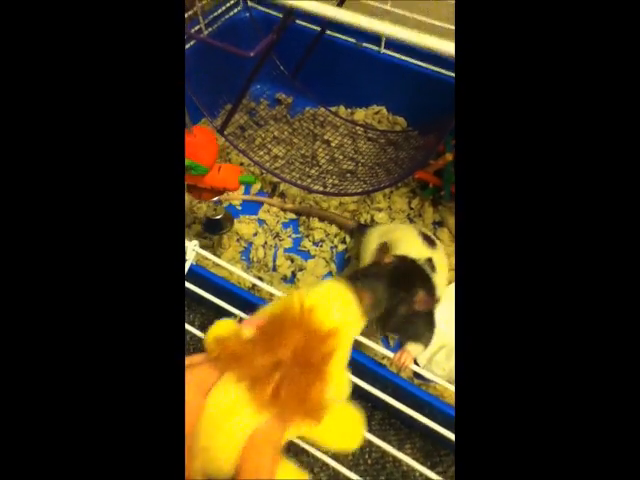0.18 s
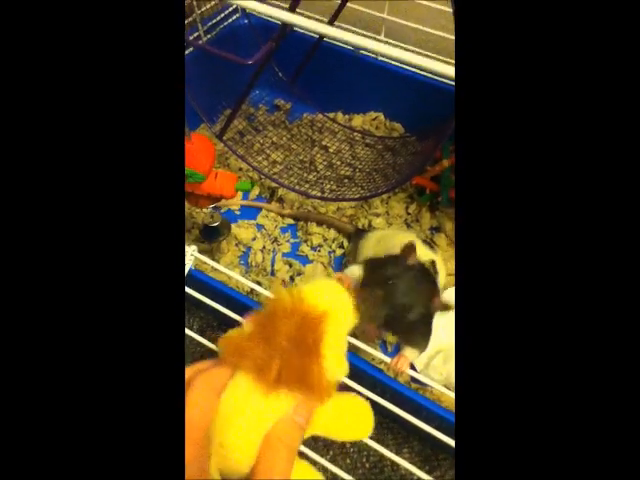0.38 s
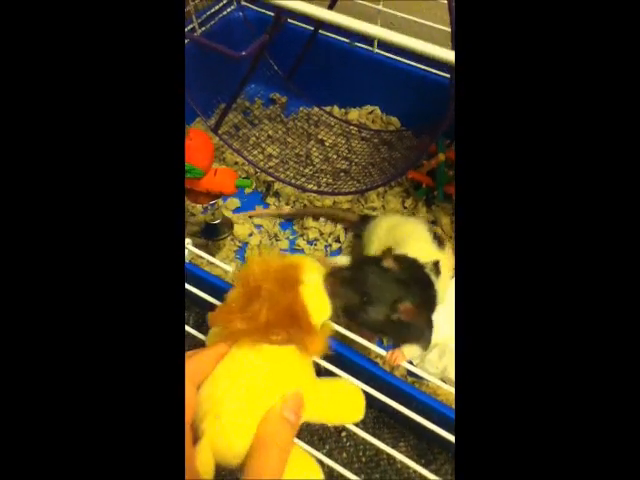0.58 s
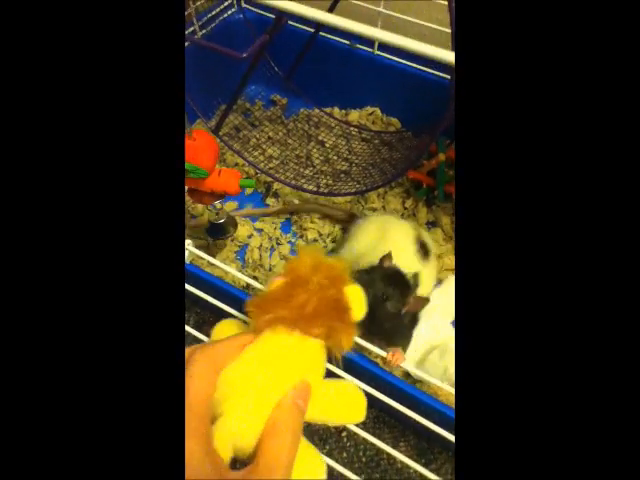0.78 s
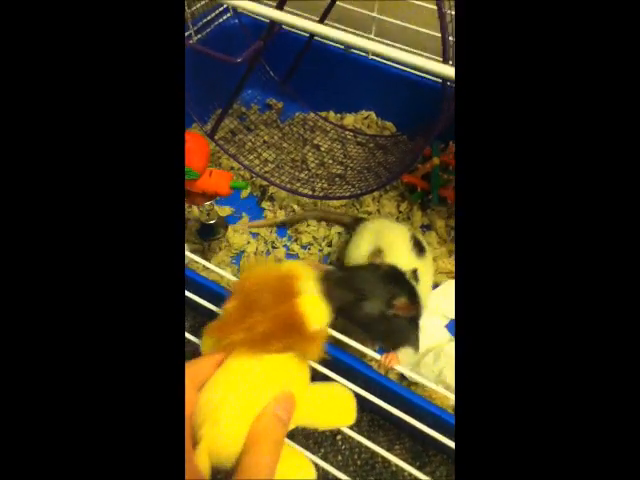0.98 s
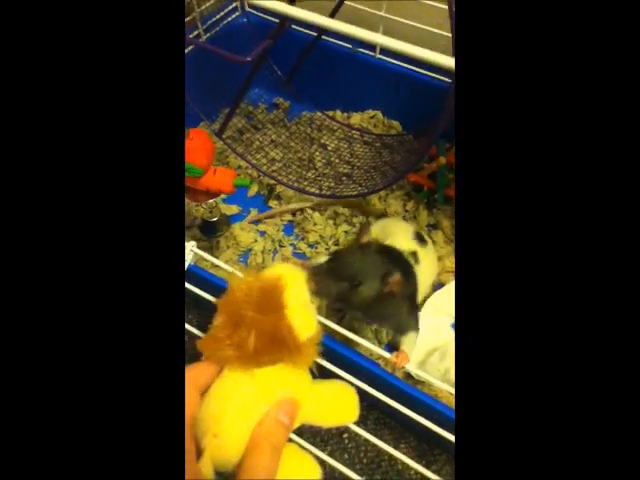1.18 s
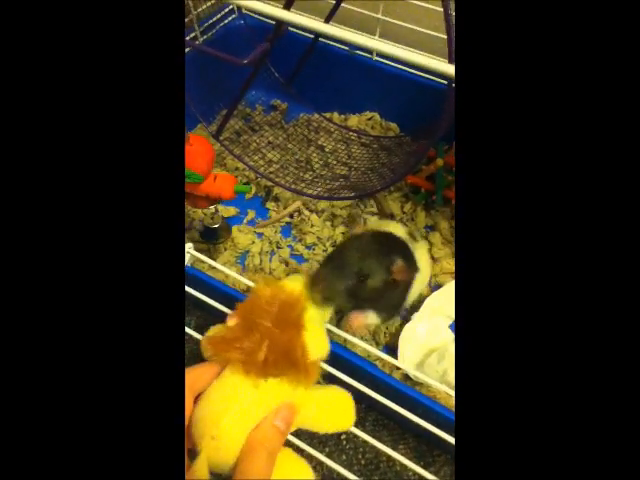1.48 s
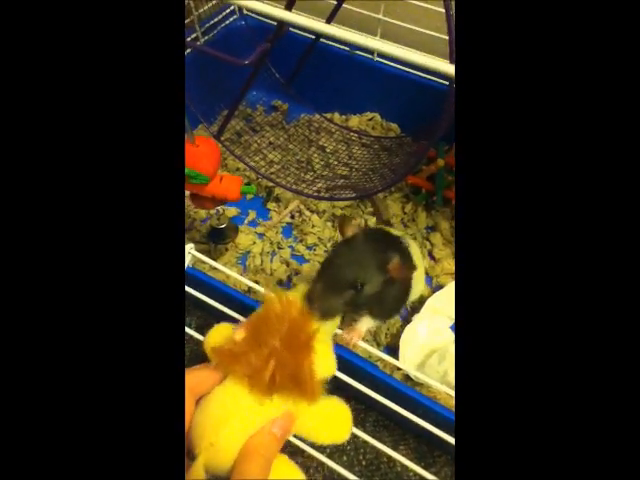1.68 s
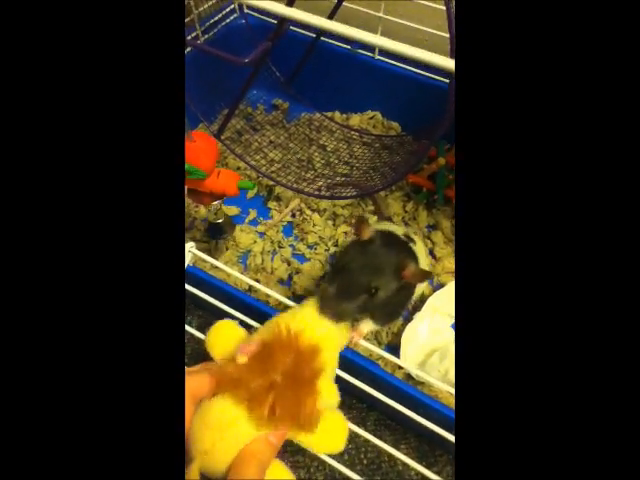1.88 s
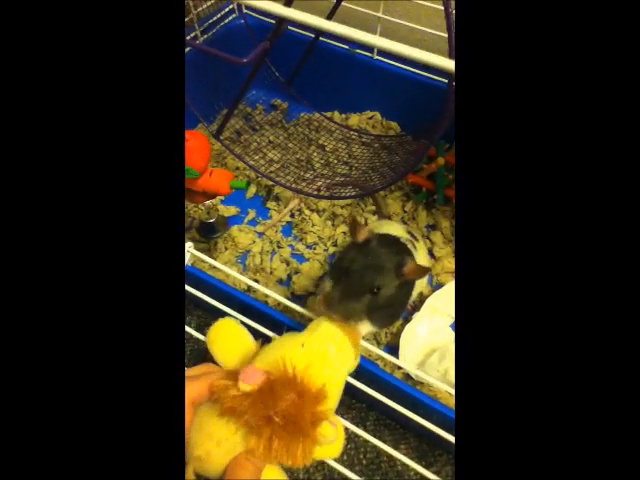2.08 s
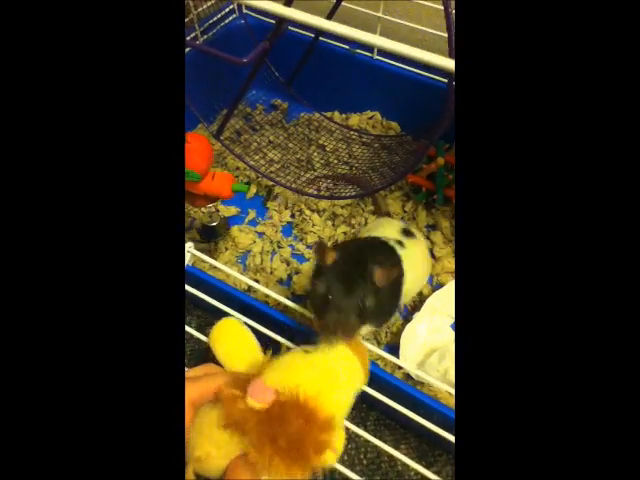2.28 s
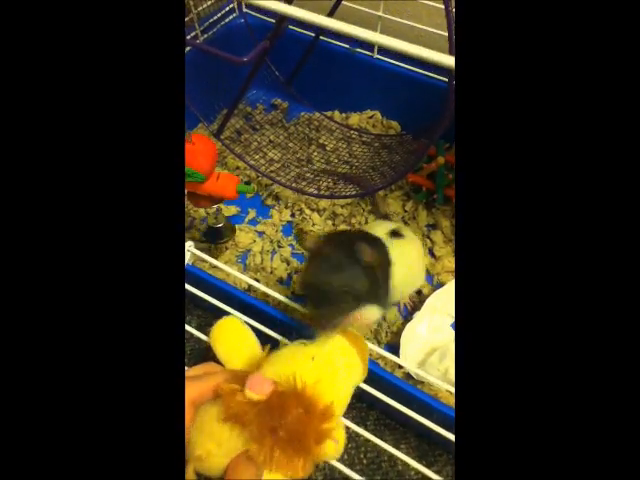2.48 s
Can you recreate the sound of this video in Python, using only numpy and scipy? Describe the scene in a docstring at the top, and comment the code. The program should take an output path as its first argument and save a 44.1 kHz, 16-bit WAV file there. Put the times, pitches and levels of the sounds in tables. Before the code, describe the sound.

Close up in a small room, a rat squeaks once, high and sharp. As it tugs a plush toy, its wire cage knocks and scrapes briefly. Two tiny peeps and light tooth or claw ticks follow over a faint fan hum.

```python
"""A pet rat tugs at a plush toy at the door of its wire cage, close by in a small room.
Pulses of air ring its throat in one sharp squeak; later it whistles two tiny falling peeps.
Its teeth or claws tick, plush and bedding rustle, and the toy bumps the plastic tray.
The tugging knocks and scrapes the wire against the tray, making them ring.
A fan-like hum runs underneath."""
import sys
import numpy as np
from scipy import signal
from scipy.fft import rfft, irfft
from scipy.io import wavfile

SR = 44100
rng = np.random.default_rng(int(sys.argv[2]) if len(sys.argv) > 2 else 0)


def to_wav(sig):
    """Store sig (one row per channel, or 1-D mono) as 16-bit WAV at the path in sys.argv[1].

    Samples outside -1..1 are clipped; the rate is SR.
    """
    pcm = np.clip(np.atleast_2d(sig), -1, 1) * 32767
    pcm = np.round(pcm).astype(np.int16)
    wavfile.write(sys.argv[1], SR, pcm.T)  # frames by channels


N = 114660
TIME = np.arange(N) / SR

# notes the plastic tray rings with: f/Hz, level/dB, time to fade by 60 dB/s
TRAY_NOTES = [(219, -13, 0.078), (379.5, 3.5, 0.083), (467, -0.5, 0.054), (716, -1, 0.17),
              (768, 6.5, 0.052), (943, -2.5, 0.039), (1196, -2, 0.025), (2040, -5, 0.036)]
# colour (how strong each frequency is) of wire grating on the tray: f/Hz, level/dB
GRIT_COLOUR = [(100, -16), (400, -3), (2000, -1.5), (2600, -5.5), (4500, -6), (8000, -13), (11000, -18),
               (15000, -55)]


def amp(db):
    """Turns decibels into a gain to multiply by."""
    return 10 ** (np.asarray(db) / 20)


def unit(x):
    """Scales a signal to an average size (rms) of 1."""
    return x / np.sqrt(np.mean(x ** 2) + 1e-20)


def read(points, hz):
    """Looks up a table between its rows, on a log-frequency axis."""
    f, value = np.transpose(points)
    return np.interp(np.log(hz + 1), np.log(f + 1), value)


def curve(points):
    """Joins (time, value) points with straight lines."""
    return np.interp(TIME, *np.transpose(points))


def level(points):
    """Gain over time from (time, dB) points, silent outside them."""
    return amp(curve(points)) * (TIME >= points[0][0]) * (TIME <= points[-1][0])


def add(mix, start, sound):
    """Mixes a sound in at a start time in seconds."""
    part = mix[max(round(start * SR), 0):][:len(sound)]
    part += sound[:len(part)]


def drift(rate_hz):
    """Smooth random wavering of rms 1."""
    keep_slow = np.exp(-(np.fft.rfftfreq(N, 1 / SR) / rate_hz) ** 2)
    return unit(irfft(rfft(rng.standard_normal(N)) * keep_slow, N))


def noise(colour):
    """Steady noise of a given colour, rms 1."""
    gain = amp(read(colour, np.fft.rfftfreq(N, 1 / SR)))
    return unit(irfft(rfft(rng.standard_normal(N)) * gain, N))


def impulse(colour, size=2048):
    """A click of a given colour, energy 1; it also serves as a filter."""
    log_gain = np.log(amp(read(colour, abs(np.fft.fftfreq(size, 1 / SR)))))
    spectrum = np.exp(np.conj(signal.hilbert(log_gain)))  # packs the energy at the start
    click = np.fft.ifft(spectrum).real[:size // 2]
    return click / np.linalg.norm(click)


def ring(notes, size=6000):
    """The fading notes of a struck object, peak 1."""
    t = TIME[:size]
    sound = sum(amp(db - 60 * t / fade_s) * np.sin(2 * np.pi * hz * t) for hz, db, fade_s in notes)
    return sound / abs(sound).max()


def through(x, response):
    """Filters a sound: every sample sets off a copy of the response."""
    return signal.oaconvolve(x, response)[:N]


def low_cut(x, hz):
    """Gently removes the bass below a frequency."""
    return signal.sosfilt(signal.butter(2, hz, "high", fs=SR, output="sos"), x)


def swells(rows):
    """A gain that rises and falls in a bell shape for each soft touch."""
    return sum(amp(db) * np.exp(-.5 * ((TIME - middle) / width) ** 2) for middle, width, db in rows)


def fan():
    """A fan-like low rush with a few wavering tones."""
    # tones of the hum: f/Hz, rms level/dB
    tones = [(186, -66.5), (291, -64.5), (372, -65), (909, -63.5), (4603, -79.5), (5383, -80),
             (14992, -90.5)]
    # colour of the rush: f/Hz, level/dB
    rush_colour = [(25, -4), (50, -6), (75, -8.5), (97, 1.5), (150, -1), (185, 3), (240, -1), (370, -4.5),
                   (520, -7), (700, -15.5), (900, -7), (1100, -12.5), (1400, -8.5), (1900, -18.5),
                   (2600, -16.5), (3500, -17.5), (4200, -22.5), (6500, -27), (9000, -28.5), (15500, -36)]
    # loudness of the rush: t/s, level/dB
    rush_level = [(0, -54), (.45, -52.5), (1.2, -51.5), (2.0, -52), (2.7, -51)]
    hum, waver_hz = np.zeros(N), 6
    for hz, db in tones:
        pitch = hz + waver_hz * drift(rate_hz=15)
        hum += amp(db) * np.sqrt(2) * np.sin(2 * np.pi * np.cumsum(pitch) / SR)
    return amp(curve(rush_level)) * noise(rush_colour) + hum


def rustles():
    """Plush and bedding brush together in faint swells of hiss."""
    # each rustle: middle t/s, width/s, level/dB
    touches = [(.005, 0.012, -63), (.398, .018, -60), (1.51, 0.016, -69), (1.61, .018, -61)]
    # colour of the hiss: f/Hz, level/dB
    hiss_colour = [(1000, -40), (4000, -7), (6500, -13), (8800, -2.5), (11000, -12), (15000, -20)]
    return noise(hiss_colour) * swells(touches)


def squeak():
    """Pulses and puffs of air ring the throat; as effort ends, the voice sags, dulls and roughens."""
    # pitch of the voice: t/s, f/Hz
    pitch_points = [(.2415, 1378), (.248, 1376), (.261, 1356), (.274, 1330), (.279, 1300), (.284, 1238),
                    (.289, 1150)]
    # how hard the rat pushes: t/s, level/dB (0 is full effort)
    effort_points = [(.2392, -32), (.2412, -26), (.2422, 0), (.262, -1), (.276, -1), (.283, -7),
                     (.287, -18), (.291, -42)]
    # colour given by the throat and mouth: f/Hz, level/dB
    throat_colour = [(300, -17), (1350, -16.5), (2720, -10.5), (4080, -17), (5450, -9.5), (6800, -10),
                     (8150, -2), (9100, 3.5), (9650, -7.5), (10800, -23.5), (11600, -29), (12300, -29),
                     (13200, -72)]
    # colour of the airy rasp: f/Hz, level/dB
    rasp_colour = [(300, -21), (720, -1), (1000, -4), (1900, -15), (2600, 0.5), (3500, -11), (5500, 0.5),
                   (7000, -2), (8800, 2.5), (10500, -9.5), (12500, -24.5), (13500, -51)]
    voice_db, rasp_db = -17, -39
    effort = level(effort_points)
    unsteadiness = .0022 + .011 * (1 - effort) ** 2
    pitch = curve(pitch_points) * (1 + unsteadiness * drift(rate_hz=400))
    phase = 2 * np.pi * np.cumsum(pitch) / SR
    # ten harmonics (multiples of the pitch); the higher ones fade first as effort drops
    pulses = sum(effort ** (.39 + .06 * k) * np.cos(k * phase) for k in range(1, 11)) / np.sqrt(5)
    puffs = unit((1 + np.cos(phase)) * rng.standard_normal(N)) * effort ** .6  # one each cycle
    flutter = 1 + .061 * drift(rate_hz=500)
    voice = through(pulses * flutter, impulse(throat_colour))
    rasp = through(puffs, impulse(rasp_colour))
    return amp(voice_db) * voice + amp(rasp_db) * rasp


def ticks():
    """Teeth or claws make dry, woody ticks, each with a bright snap and one close echo."""
    # each tick: t/s, level/dB, snap relative to that level/dB
    hits = [(0.3374, -21.5, -34), (1.734, -40.5, -10), (1.8326, -38, -14), (1.8359, -33.5, -1),
            (1.8407, -25, -8), (1.8435, -29, -6), (1.9327, -36, -12), (1.936, -36, -5), (1.9399, -32.5, -3)]
    # colour of the woody part: f/Hz, level/dB
    body_colour = [(100, -28), (900, -12.5), (1700, -6.5), (2300, 4), (2750, 3), (3350, 1.5), (3900, 1.5),
                   (4700, -0.5), (6500, -12.5), (10000, -24), (15000, -30)]
    # colour of the snap: f/Hz, level/dB
    snap_colour = [(500, -13), (4000, -33), (9000, 20), (12000, 10), (15000, -1)]
    echo_s, echo_db = .00092, -10
    out, body, snap = np.zeros(N), impulse(body_colour), impulse(snap_colour)
    for start, db, snap_db in hits:
        tick = body / abs(body).max() + amp(snap_db) * snap
        add(out, start, amp(db) * tick)
        add(out, start + echo_s, amp(db + echo_db) * tick)
    return out


def knocks():
    """The wire clacks and bounces once, and the tray under it thuds; soft knocks tend to be duller."""
    # each knock: t/s, clack level before dulling/dB, thud level/dB, treble cutoff f/Hz
    hits = [(0.6031, -42, -41.5, 4000), (0.8564, -17.5, -34, 10100), (0.9446, -27, -29.5, 9200),
            (1.0660, -45, -42, 4000), (1.0807, -38.5, -56, 8000), (1.1189, -30, -38.5, 2930)]
    # notes the wire rings with: f/Hz, level/dB, time to fade by 60 dB/s
    wire_notes = [(2160, -1, .017), (2500, 0.5, 0.008), (3950, -4, 0.011), (4560, 5.5, 0.0068),
                  (5000, -4, .012), (5750, -1.5, 0.009), (6200, 0, 0.0083), (8300, -24, .007)]
    crack_db, crack_s, bounce_s, bounce_db = -21, .002, .002, -4
    out, wire, tray = np.zeros(N), ring(wire_notes), ring(TRAY_NOTES)
    crack_fade = amp(crack_db) * np.exp(-TIME[:len(wire)] / crack_s)
    for start, clack_db, thud_db, cutoff_hz in hits:
        dulling = signal.butter(2, cutoff_hz, fs=SR, output="sos")
        for delay, drop_db in ((0, 0), (bounce_s, bounce_db)):
            crack = noise(GRIT_COLOUR)[:len(wire)] * crack_fade
            clack = signal.sosfilt(dulling, wire + crack)
            add(out, start + delay, amp(clack_db + drop_db) * clack)
        add(out, start, amp(thud_db) * tray)
    return out


def bumps():
    """The soft toy bumps the tray, making dull swells of noise."""
    # each bump: middle t/s, width/s, level/dB
    touches = [(.615, .014, -64), (.72, 0.0073, -52), (.98, .015, -49), (1.17, 0.049, -61.5)]
    # colour of a bump: f/Hz, level/dB
    bump_colour = [(60, -16.5), (180, -7), (450, -6), (740, -5), (950, 3), (1200, -6), (2000, -9.5),
                   (4500, -20), (12000, -29.5)]
    return noise(bump_colour) * swells(touches)


def scrape():
    """The wire slides in quick, uneven slips that shake the tray; grit crackles on top in clumps."""
    # force of the scrape: t/s, relative level/dB
    force = [(.86, -23), (.892, -21), (.8955, -1), (.908, 1), (.914, -6), (.92, -19), (.95, -22),
             (1.0, -30)]
    typical_slips_per_s, clump_db, tray_db, grit_db = 1100, 6.5, -31.5, -41
    travel = np.cumsum(typical_slips_per_s * np.exp(.5 * drift(rate_hz=1500))) / SR
    spikes = np.diff(np.floor(travel), prepend=0)  # one each time travel passes a whole number
    slips = unit(spikes * rng.choice([-1, 1], N)) * level(force)
    tray = low_cut(ring(TRAY_NOTES), hz=260)
    shaking = through(slips, tray / np.linalg.norm(tray))
    clumps = amp(clump_db * drift(rate_hz=250))
    grit = through(slips * clumps, impulse(GRIT_COLOUR))
    return amp(tray_db) * shaking + amp(grit_db) * grit


def peeps():
    """The rat whistles two thin, pure notes that hold, then fall away."""
    # each peep: start t/s, length/s, starting f/Hz, fall/Hz, level before shaping/dB
    whistles = [(1.176, .021, 8800, 1300, -55.5), (1.238, .007, 8800, 1800, -55)]
    out = np.zeros(N)
    for start, length, hz, fall_hz, db in whistles:
        progress = np.linspace(0, 1, round(length * SR))
        swell = np.sqrt(abs(np.sin(np.pi * progress))) * (1 - .5 * progress)
        pitch = hz - fall_hz * progress ** 3
        add(out, start, amp(db) * swell * np.sin(2 * np.pi * np.cumsum(pitch) / SR))
    return out


def room(x, size=16384):
    """Quick echoes off the cage, then the room's short tail, whose treble dies first."""
    # how long the room rings: f/Hz, time to fade by 60 dB/s
    fade_times = [(200, .25), (1500, .24), (5000, 0.22), (10000, 0.074)]
    echoes_per_s, early_fade_s, early_db, tail_db = 4000, .006, -17.5, -22
    t = TIME[:size]
    echoes = rng.choice([-1., 1.], size) * (rng.random(size) < echoes_per_s / SR) * (t > .002)
    early = echoes * np.exp(-t / early_fade_s)
    # split noise into frequency bands and fade each at its own speed
    hz, age, bands = signal.stft(rng.standard_normal(size) * (t > .008), SR, nperseg=256)
    fade = amp(-60 * age / read(fade_times, hz)[:, None])
    tail = signal.istft(bands * fade, SR, nperseg=256)[1][:size]
    response = amp(early_db) * early / np.linalg.norm(early) + amp(tail_db) * tail / np.linalg.norm(tail)
    return through(x, response)


def scene():
    """The rat and its cage in the room, over the hum, in one channel."""
    near = squeak() + peeps() + ticks() + knocks() + scrape() + rustles() + bumps()
    return (near + room(near) + fan())[None]


def record(dry):
    """The microphone thins the deep bass; then the very highest treble is cut off."""
    thin = low_cut(dry, hz=80)
    treble_cut = signal.firwin(511, cutoff=15950, window=("kaiser", 9), fs=SR)
    return signal.oaconvolve(thin, treble_cut[None], "same")


dry = scene()
out = record(dry)
to_wav(out)
```